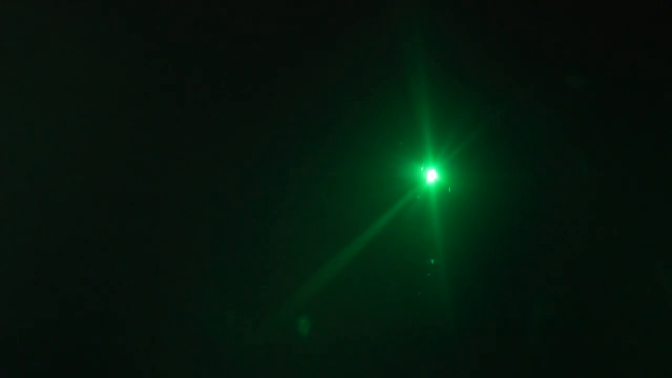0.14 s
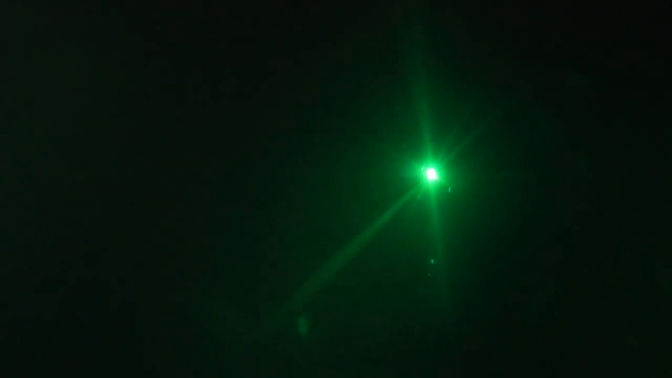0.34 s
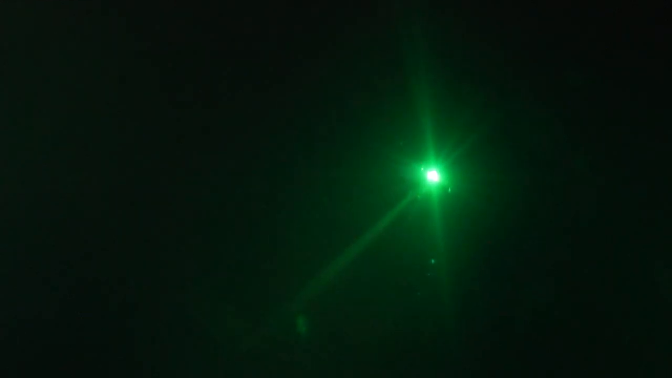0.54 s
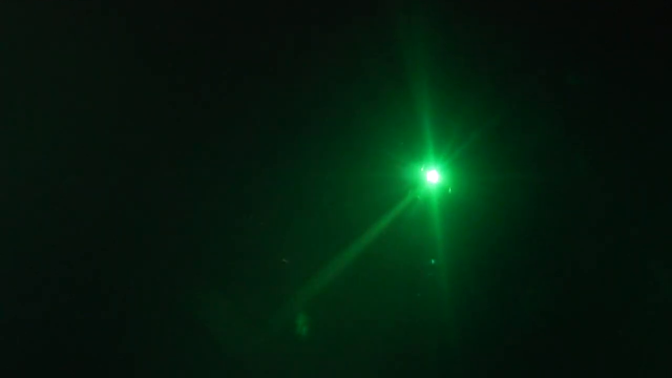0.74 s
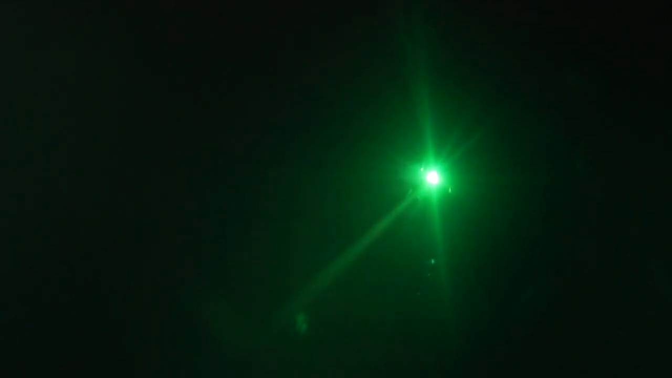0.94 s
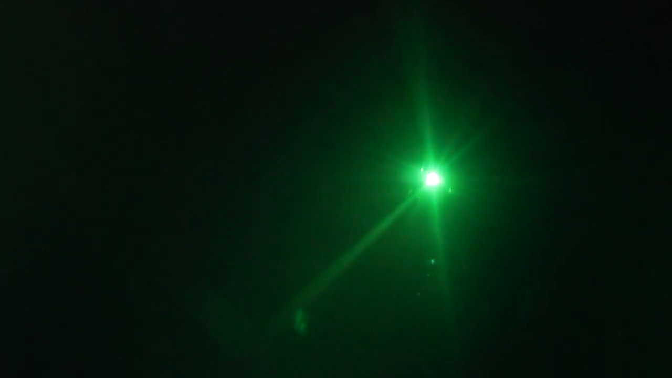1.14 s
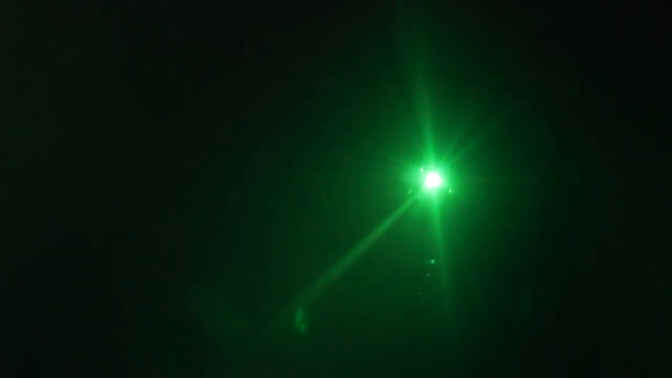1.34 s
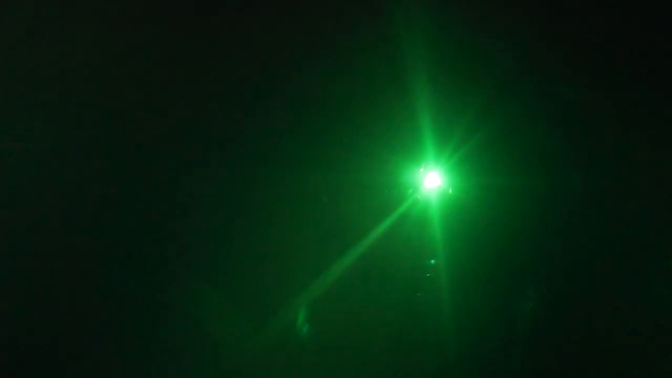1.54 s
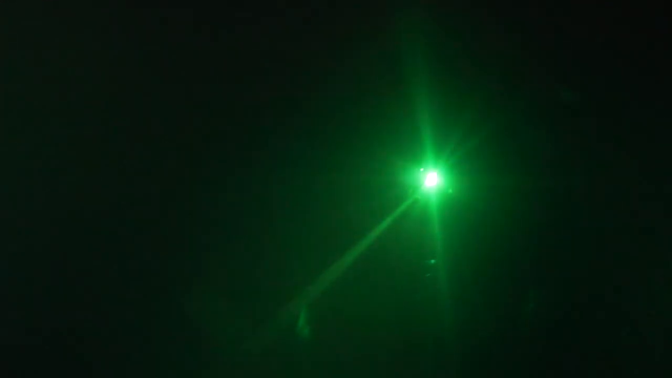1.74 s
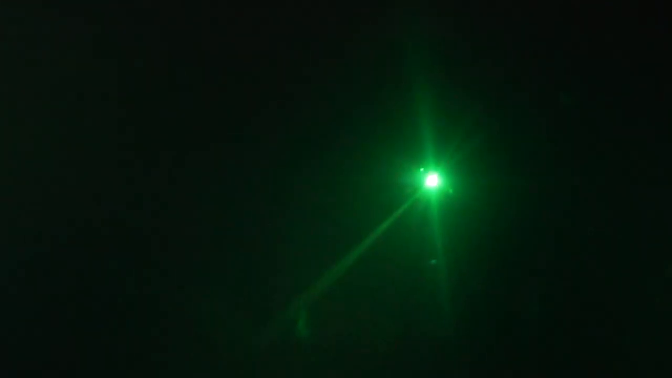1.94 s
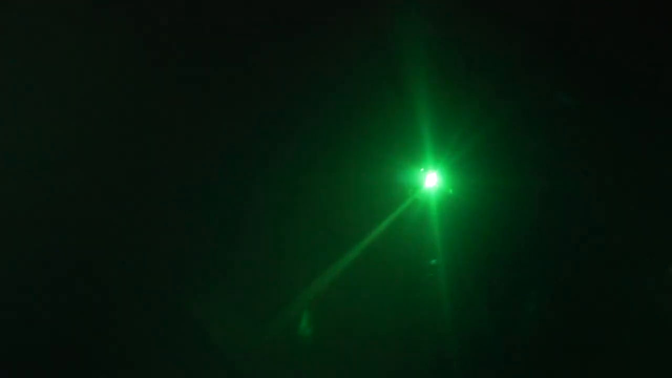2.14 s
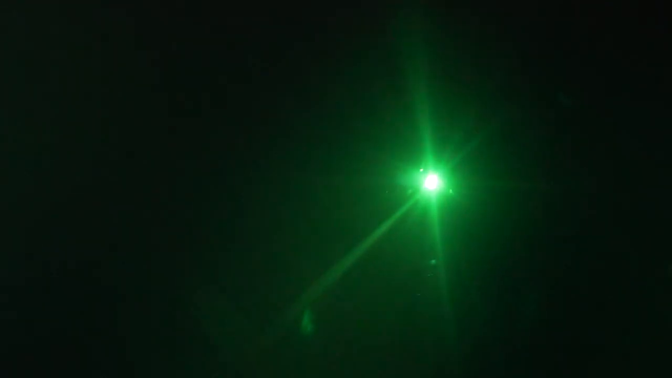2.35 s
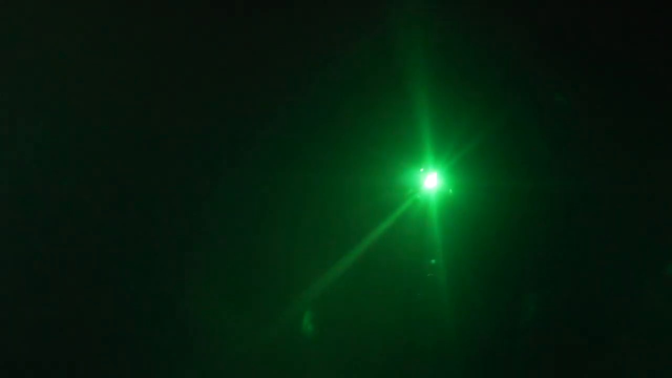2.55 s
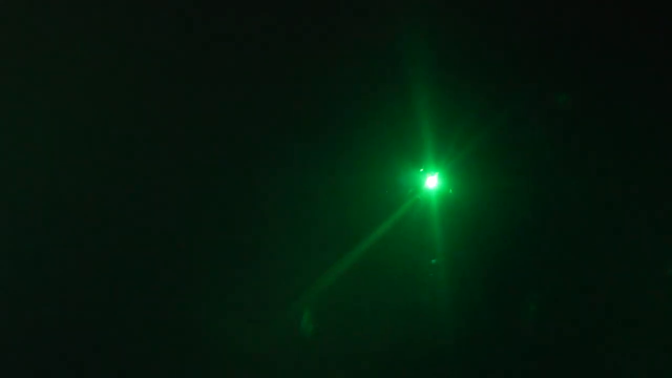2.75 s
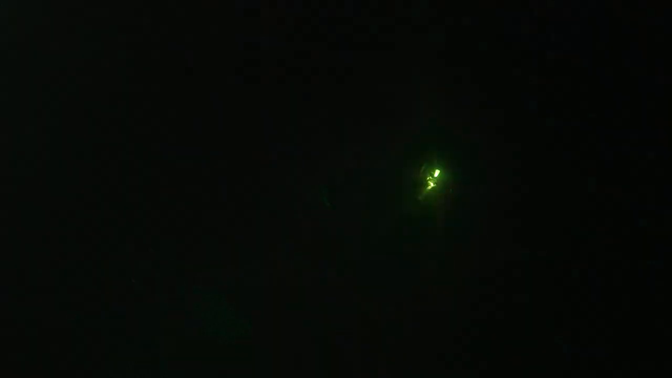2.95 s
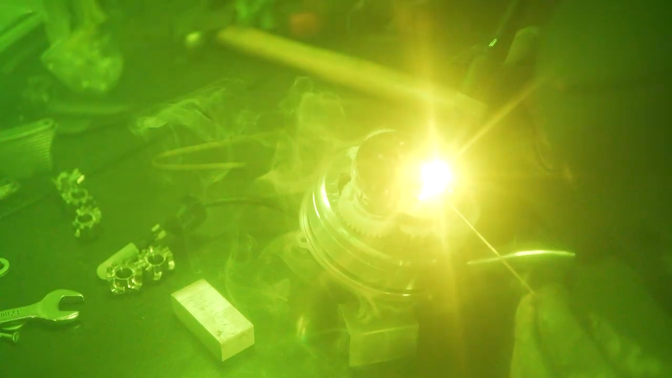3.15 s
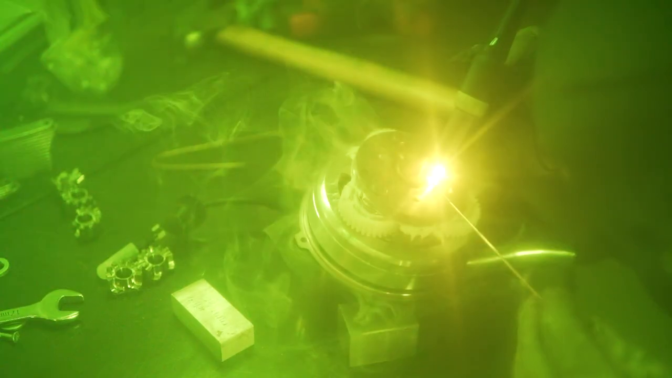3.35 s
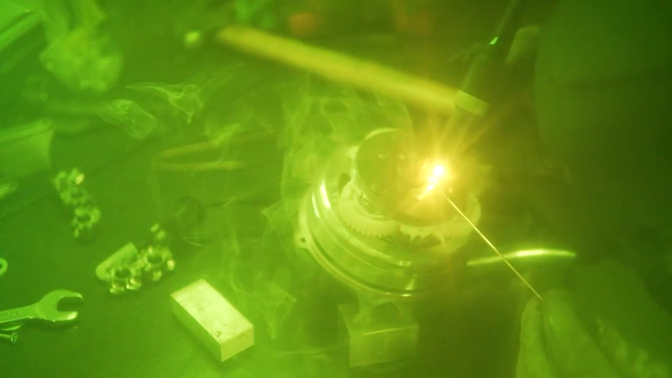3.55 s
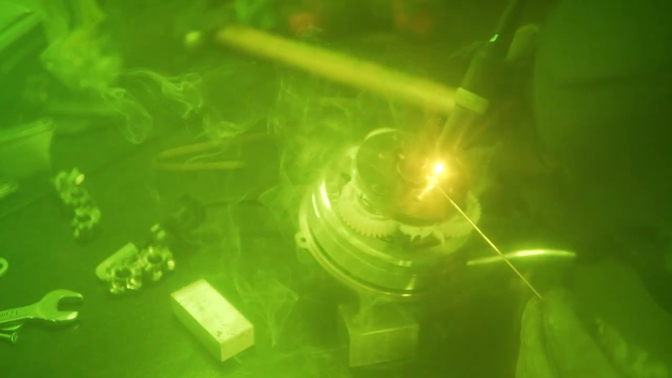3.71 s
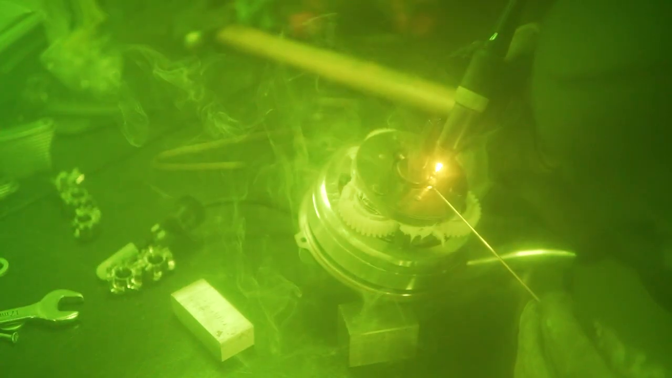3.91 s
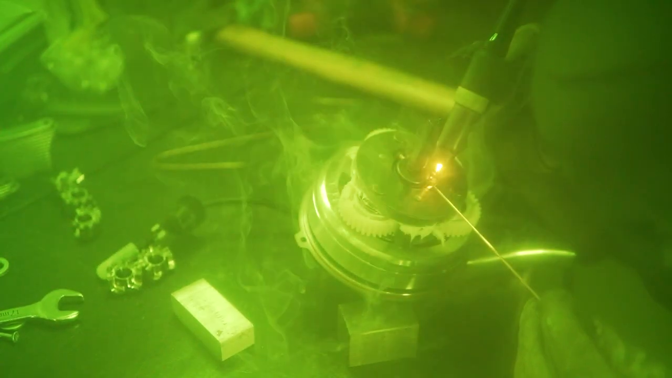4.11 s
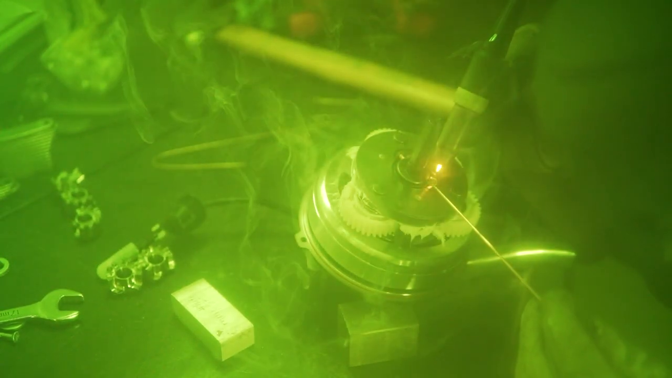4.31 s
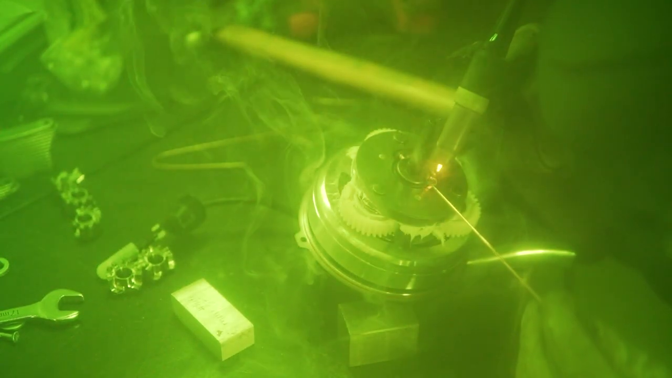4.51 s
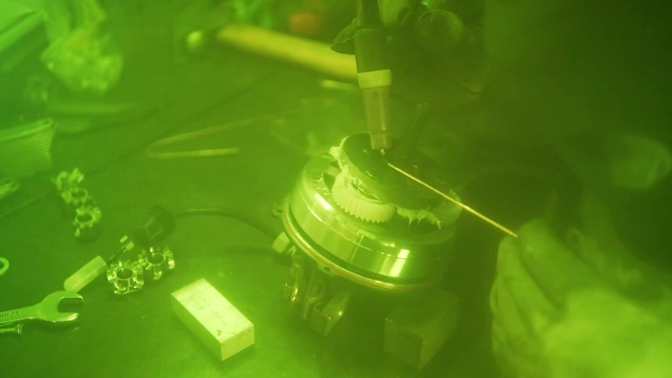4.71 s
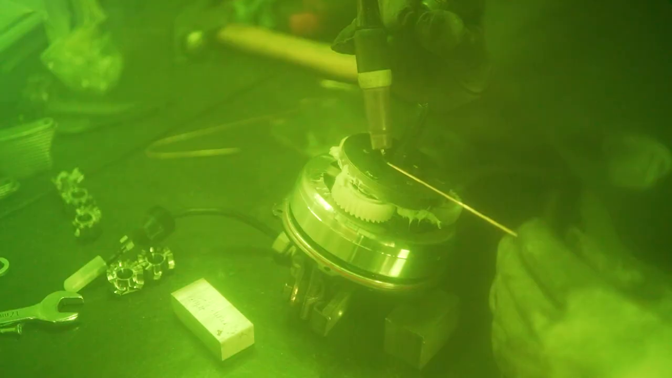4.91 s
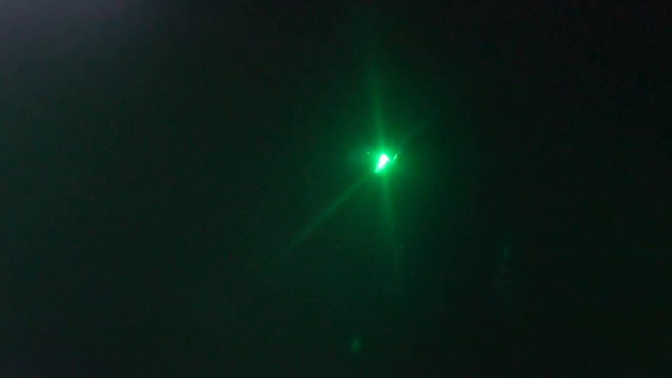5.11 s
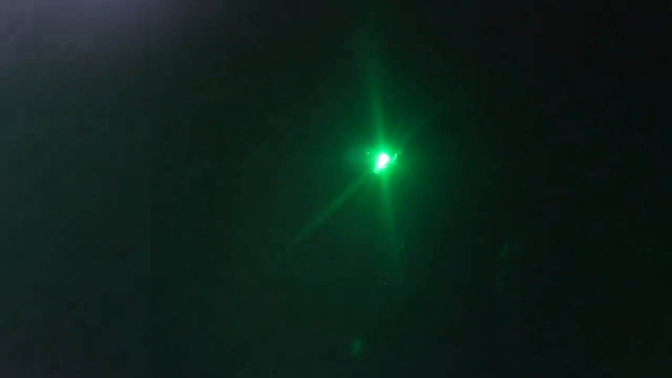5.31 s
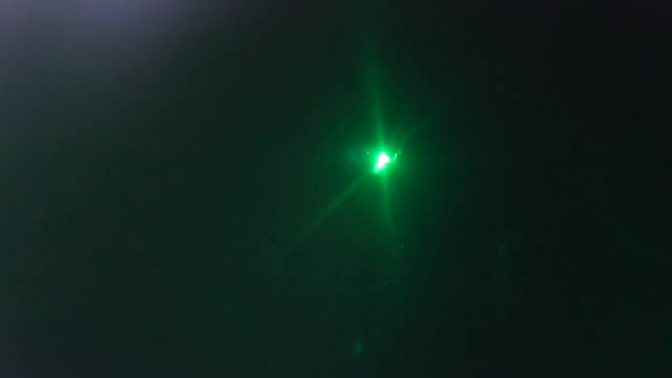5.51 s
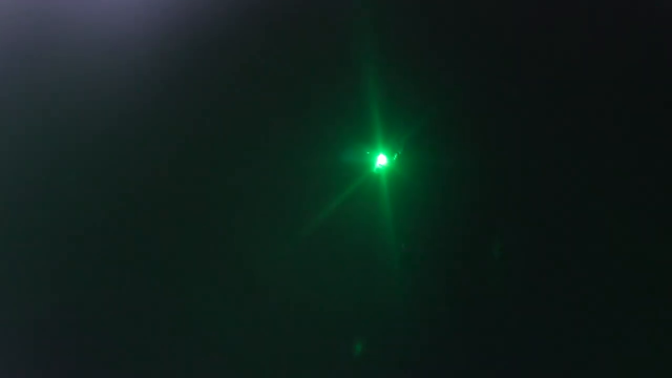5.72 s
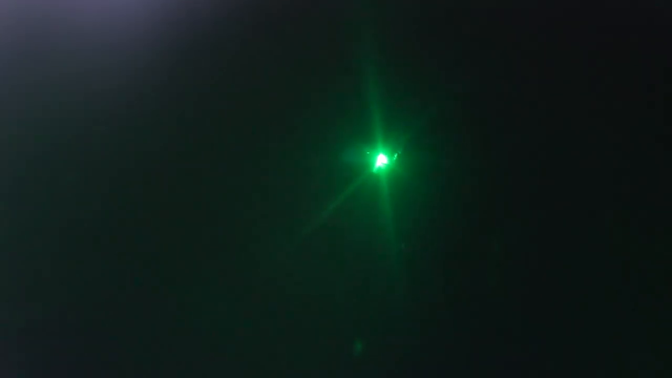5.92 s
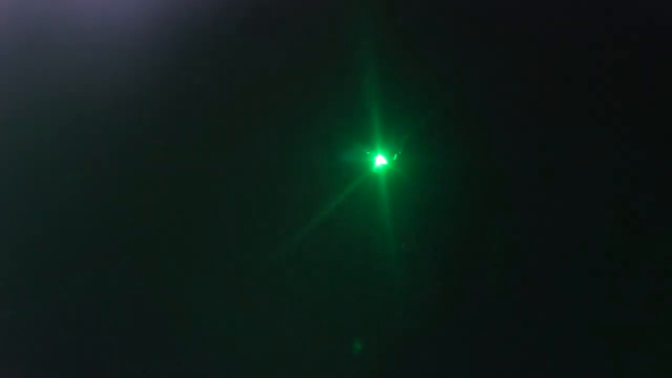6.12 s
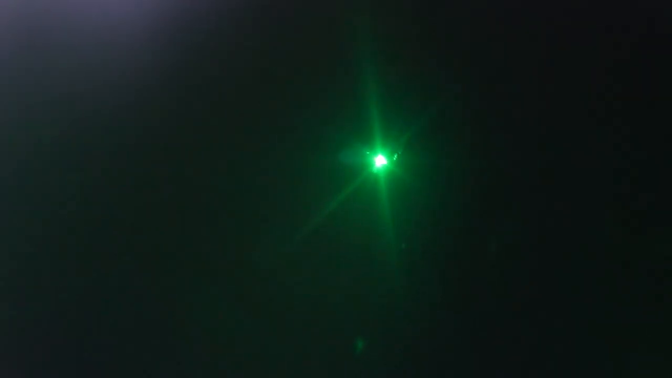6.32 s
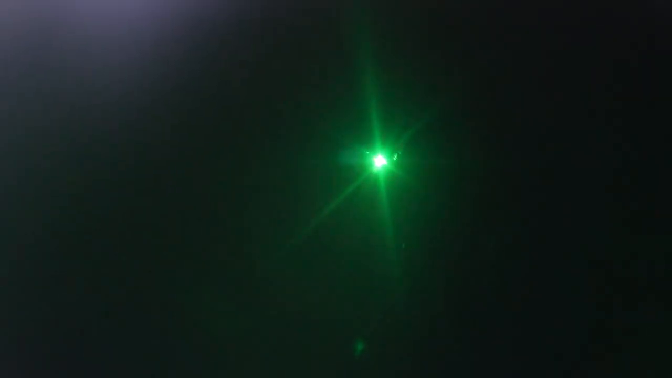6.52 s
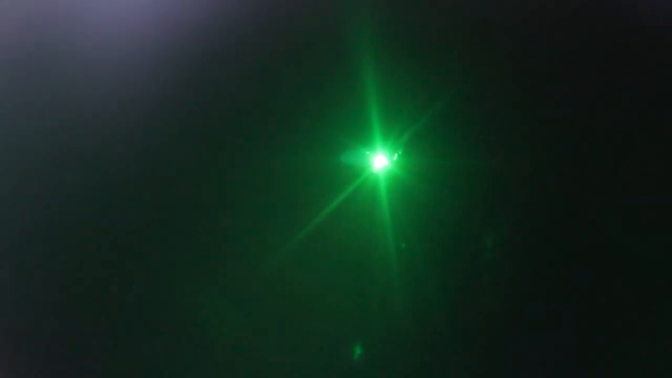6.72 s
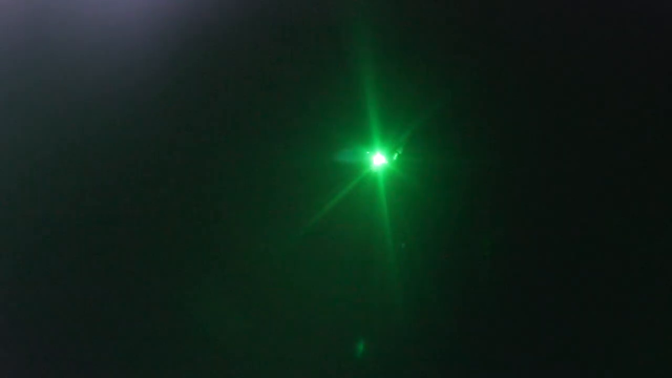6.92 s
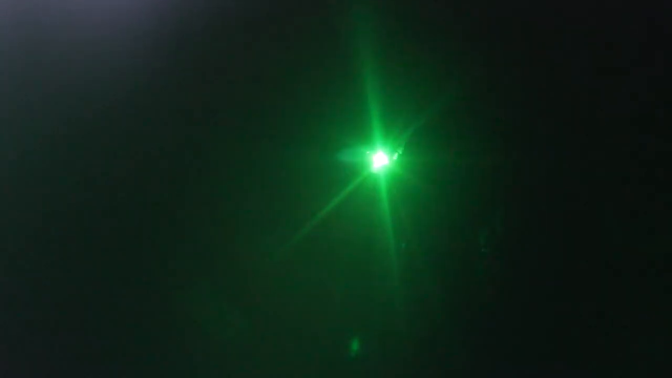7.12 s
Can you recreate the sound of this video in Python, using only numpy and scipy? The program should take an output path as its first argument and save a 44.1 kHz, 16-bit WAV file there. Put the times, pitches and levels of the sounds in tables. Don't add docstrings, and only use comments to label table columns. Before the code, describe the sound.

An electric arc welder crackles and hisses, breaks off with hard snaps and clunks, hums quietly, then strikes again with a bang and crackles on.

```python
import sys
import numpy as np
from scipy import signal
from scipy.fft import rfft, irfft
from scipy.io import wavfile
from scipy.ndimage import uniform_filter1d

SR = 44100
rng = np.random.default_rng(int(sys.argv[2]) if len(sys.argv) > 2 else 0)


def generate_wav(signal):
    frames = np.transpose(np.atleast_2d(signal))
    scaled = np.clip(frames, -1, 1) * 32767
    pcm = np.round(scaled).astype(np.int16)
    wavfile.write(sys.argv[1], SR, pcm)


def ratio_of_db(decibels):
    return 10 ** (np.asarray(decibels, float) / 20)


N = 320166
t = np.arange(N) / SR

CLOCK_S = 0.01
ARC_OUT_S, SCENE_CHANGE_S = 3.0, 4.738
# start_s, peak_db
BREAK = [
    (2.9404, -8),
    (2.9505, -3),
    (2.9604, -7.5),
    (2.9904, -13.5),
]
# start_s, bang_db, bang_t60_s, spatter_db, spatter_t60_s, spits_per_s
STRIKE = (5.1246, -3, 0.01, -20, 0.71, 8000)
# start_s, peak_db
FAINT = [(0.04, -24.1), (0.5, -24.2), (0.56, -23.9), (0.57, -23.6), (0.66, -24.5), (0.71, -22.8),
         (0.72, -22.1), (1.44, -24.3), (1.67, -22.8), (1.94, -23.2), (2.02, -21.8), (2.07, -20.1),
         (2.28, -21.3), (2.3, -21.4), (2.49, -19.0), (2.83, -22.7), (5.18, -22), (5.19, -18.1),
         (5.26, -20.7), (5.3, -22.1), (6.1, -20.2), (6.22, -23.6), (6.31, -23.7), (6.37, -22.6),
         (6.39, -20.1), (6.63, -23.3), (6.69, -21.3), (6.78, -22.5), (6.8, -20.1), (6.84, -22.0),
         (6.9, -21.0), (6.93, -23.7), (7.16, -18.8), (7.2, -23.6)]


def rms_one(x):
    return x / np.sqrt(np.mean(x ** 2) + 1e-20)


def in_time(rows):
    s, *columns = np.transpose(rows)
    return [np.interp(t, s, c) for c in columns]


def drift(rate):
    r = np.exp(-80 * np.pi * rate / SR)
    slow = signal.lfilter([1], [1, -2 * r, r * r], rng.standard_normal(N // 40 + 2002))[2000:]
    return np.interp(np.arange(N) / 40, np.arange(len(slow)), rms_one(slow))


def resonance(x, hz, width_hz):
    r = np.exp(-np.pi * width_hz / SR)
    poles = [1, -2 * r * np.cos(2 * np.pi * hz / SR), r * r]
    return signal.lfilter([(1 - r * r) / 2, 0, (r * r - 1) / 2], poles, x)


def lifted(x, hz, width_hz, db):
    return x + (ratio_of_db(db) - 1) * resonance(x, hz, width_hz)


def coloured(x, spectrum, peaks=(), lift_db=0):
    hz = np.fft.rfftfreq(len(x), 1 / SR) + 1
    at, level = np.transpose(spectrum)
    power = ratio_of_db(np.interp(np.log(hz), np.log(at), level, left=-90)) ** 2
    for centre, width, db in peaks:
        power = power + ratio_of_db(db + lift_db) ** 2 / (1 + (2 * (hz - centre) / width) ** 2) ** 2
    return rms_one(irfft(rfft(x) * np.sqrt(power), len(x)))


def clicks(rows):
    s, db = np.transpose(rows)
    out = np.zeros(N)
    out[np.round(s * SR).astype(int)] = ratio_of_db(db) * (-1) ** np.arange(len(s))
    return out


def ticks_of(rows):
    s, db = np.transpose(rows)
    return np.round(s / CLOCK_S).astype(int), db


def snaps():
    # start_s, peak_db
    loose_snaps = [
        (5.1664, -15),
        (5.2285, -19),
        (5.2385, -24),
        (5.2557, -6.5),
        (5.2615, -14),
        (5.2775, -17),
    ]
    # start_s, peak_db, thin (0 dull, 1 thin)
    droplets = [(0.0504, -20, 0), (1.0192, -14, 1), (1.1082, -15, 0), (1.1829, -14, 1), (1.1884, -20, 1),
                (1.197, -19, 0), (1.2023, -20, 0), (1.2347, -16, 0), (1.238, -17, 0), (1.243, -13, 0),
                (1.2623, -18, 0), (1.2744, -16, 0), (1.2834, -19, 0), (1.3342, -12, 0), (1.3471, -17, 0),
                (1.3539, -16, 0), (1.5745, -12, 0), (1.6252, -17, 0), (1.7018, -17, 0), (1.7936, -18, 0),
                (1.9873, -20, 0), (2.1473, -19, 0), (2.7339, -16, 0), (5.3028, -17, 0), (6.322, -15, 0),
                (6.6365, -17, 0), (6.8448, -18, 0), (7.2419, -17, 0)]
    # start_s, body_db
    body = [
        (0, -9),
        (2.96, -20),
        (5.2, 11.5),
        (5.8, 0.5),
        (7.26, -10),
    ]
    # delay_ms, share
    paths_1 = [(0.0, 1.0), (0.2, -0.4), (0.54, 0.35), (0.66, 0.16), (0.93, 0.83), (1.18, 0.44),
               (1.34, -0.3), (1.79, -0.3), (3.7, -0.23), (3.92, 0.15), (4.06, 0.19), (4.9, -0.29),
               (5.31, -0.18), (6.98, -0.19)]
    paths_2 = [(0.0, -0.2), (0.11, 1.0), (0.16, 0.59), (0.27, -0.24), (0.48, 0.69), (0.68, 0.3),
               (0.79, -0.76), (0.95, -0.32), (0.98, 0.7), (1.32, -0.41), (3.2, -0.16), (3.49, -0.19),
               (4.15, 0.24), (4.54, 0.17)]
    # ring_hz, width_hz, soft_top_hz, steep_top_hz
    snap_1 = (7000, 1750, 4900, 15300)
    snap_2 = (6940, 2830, 6650, 11300)
    snap_break = (4130, 3020, 4700, 8200)

    first = snap_heard(paths_1, *snap_1, thump_db=-0.5, tail_db=-26.5, tail_t60=0.079)
    second = snap_heard(paths_2, *snap_2, thump_db=2.0, tail_db=-26.5, tail_t60=0.07)
    dull = snap_heard(paths_1[:5], *snap_break, thump_db=12.0, tail_db=-25.5, tail_t60=0.14)
    thin = snap_heard(paths_1[:3], 11000, 5000, 15000, 17000, thump_db=-9, tail_db=-17.5, tail_t60=0.05)

    steps = current_steps() + clicks(loose_snaps)
    steps = steps + on_clock(*ticks_of(FAINT), 1) + ratio_of_db(-8.0) * clicks(BREAK)
    clocked = ratio_of_db(2.0) * signal.fftconvolve(steps * (t < SCENE_CHANGE_S), first)[:N]
    clocked += ratio_of_db(-0.13) * signal.fftconvolve(steps * (t > SCENE_CHANGE_S), second)[:N]
    clocked += ratio_of_db(in_time(body)[0]) * resonance(clocked, 2110, 1340)

    torn = signal.fftconvolve(np.abs(steps), np.exp(-t[:800] / 0.0012))[:N] * rng.standard_normal(N)
    clocked += ratio_of_db(-19) * resonance(torn, 6000, 7000)

    dull_rows = BREAK + [(s, db - 0.5) for s, db, is_thin in droplets if not is_thin]
    thin_rows = [(s, db - 7.5) for s, db, is_thin in droplets if is_thin]
    dull_spits = signal.fftconvolve(clicks(dull_rows), dull)[:N]
    thin_spits = signal.fftconvolve(clicks(thin_rows), thin)[:N]
    return clocked + dull_spits + thin_spits


def current_steps():
    # start_s, peak_db
    nudges = [(.31, -11), (.43, -13), (.48, -15.5), (.54, -15.5), (.71, -21), (.79, -13), (1.18, -10),
              (1.32, -12), (1.46, -11), (1.51, -11.5), (1.56, -11), (1.66, -19), (1.78, -12), (1.84, -11),
              (1.96, -15), (2.03, -13), (2.07, -17), (2.23, -11), (2.42, -11), (2.49, -17), (2.59, -12),
              (2.63, -16), (2.70, -15.5), (2.78, -10), (2.82, -22),
              (5.27, -21), (5.31, -14), (5.34, -12), (5.43, -10.5), (5.46, -11), (5.58, -11.5),
                (5.61, -14.5), (5.90, -9.5), (5.93, -15.5), (6.03, -11.5), (6.17, -11), (6.20, -9.5),
                (6.24, -12), (6.28, -12), (6.44, -10.5), (6.53, -15), (6.61, -11.5), (6.86, -9.5),
                (6.91, -12.5), (7.00, -14.5), (7.09, -15.5), (7.15, -15)]
    # start_s, peak_db
    held = [(.34, -13), (1.00, -17), (1.11, -12), (1.25, -9), (1.48, -17), (1.69, -15.5), (2.19, -13.5),
            (2.28, -17.5), (5.54, -9.5), (5.66, -14), (6.09, -10.5), (6.13, -16.5), (6.95, -8.5)]
    # start_s, steps, peak_db
    hunts = [(.06, 1, -20), (.09, 3, -18.5), (.14, 3, -19), (.21, 6.1, -16.5), (.66, 1, -24), (.87, 1, -22),
             (.89, 4, -15), (1.06, 4, -17.5), (1.64, 1, -19), (1.87, 4.1, -13), (2.12, 1, -15),
             (2.14, 3, -14.5), (2.74, 3, -13), (2.81, 1, -11), (5.20, 1, -18), (5.22, 3, -13.5),
             (5.74, 6.6, -10.5), (5.82, 1, -10.5), (5.98, 2.8, -14), (6.34, 3, -15), (6.41, 1, -12.5),
             (6.49, 4, -11.5), (6.56, 3.97, -13.5), (6.64, 3.7, -16.5), (6.69, 1, -21), (6.71, 3.97, -12),
             (6.82, 1, -11), (6.89, 1, -9), (7.18, 1, -15), (7.22, 4, -12)]
    # start_s, change_db
    uneven = [(0.16, 3.5), (0.22, 2.4), (0.23, -3.1), (0.24, 3.9), (0.44, -2.2), (0.79, -2.4),
              (0.89, 2.3), (1.08, 2.0), (1.19, -4.0), (1.25, -2.3), (1.33, -2.5), (1.48, -2.1),
              (1.52, 2.0), (1.54, -4.8), (1.69, -5.5), (1.71, 2.7), (1.9, -3.0), (1.97, -2.6),
              (2.04, -8.1), (2.12, -2.1), (2.23, -4.2), (2.31, -8.4), (2.64, 2.1), (2.7, -3.4),
              (2.75, -2.0), (2.82, -4.1), (2.91, -3.0), (2.92, -2.3), (2.94, 1.9),
              (5.2, 2.5), (5.24, -2.3), (5.25, -3.6), (5.34, -2.6), (5.43, -2.1), (5.46, -2.5),
                (5.47, -2.7), (5.58, -4.7), (5.68, -3.3), (5.77, -2.4), (5.8, -3.2), (5.94, -3.6),
                (5.99, -2.7), (6.0, 4.1), (6.03, -2.5), (6.11, -3.3), (6.28, 2.5), (6.35, -2.4),
                (6.58, 2.7), (6.64, 1.9), (6.65, 2.5), (6.71, -3.0), (6.74, 2.5), (6.86, -2.1),
                (6.89, -3.1), (6.92, 2.9), (7.18, -2.9), (7.25, -3.9)]

    rows = []
    for table, hold in ((nudges, 1), (held, 2)):
        for s, db in table:
            tick = round(s / CLOCK_S)
            rows += [(tick, db, 1), (tick + hold, db - 1, -1)]
    for s, steps, db in hunts:
        rows += [(round(s / CLOCK_S) + k, db, (-1) ** k) for k in range(round(steps))]
    rows += [(round(2.85 / CLOCK_S) + k, -6.5 - 0.36 * k, 1) for k in range(10)]
    ticks, db, way = np.transpose(rows)
    ticks = ticks.astype(int)

    idle = np.r_[0:297, 520:726]
    spread_db = 0.8 * rng.standard_normal(idle[-1] + 1)
    off_rule_db = np.zeros(idle[-1] + 1)
    landed, by_db = ticks_of(uneven)
    off_rule_db[landed] = by_db
    way = way * ~np.isin(ticks, ticks_of(FAINT)[0])
    stepped = on_clock(ticks, db + spread_db[ticks] + off_rule_db[ticks], way)
    return stepped + on_clock(idle, -32.0, rng.standard_normal(len(idle)))


def on_clock(ticks, db, way):
    # first_run_s, second_run_s
    clock_lag_s = (.0004, .0041)
    # one_slot_s, two_slots_s
    odd_lag_s = (.0002, .0004)
    ticks = np.asarray(ticks)
    late = np.where(ticks * CLOCK_S < SCENE_CHANGE_S, *clock_lag_s)
    late = late + ticks % 2 * rng.choice(odd_lag_s, ticks.shape)
    out = np.zeros(N)
    out[((ticks * CLOCK_S + late) * SR).round().astype(int)] = -way * ratio_of_db(db)
    return out


def snap_heard(paths, ring_hz, width_hz, soft_hz, steep_hz, thump_db, tail_db, tail_t60):
    after = t[:SR // 4]
    arrivals = np.zeros(len(after))
    for ms, share in paths:
        arrivals[round(ms * SR / 1000)] += share
    swell = np.clip(after / 0.0012, 0, 1)
    arrivals += ratio_of_db(tail_db - 60 * after / tail_t60) * swell * rng.standard_normal(len(after))
    r = np.exp(-np.pi * width_hz / SR)
    ring = signal.lfilter([1, -1], [1, -2 * r * np.cos(2 * np.pi * ring_hz / SR), r * r], arrivals)
    ring = signal.sosfilt(signal.butter(2, soft_hz, fs=SR, output="sos"), ring)
    thump = resonance(arrivals, 383, 150) + ratio_of_db(-3.5) * resonance(arrivals, 760, 750)
    steep = signal.butter(2, steep_hz, fs=SR, output="sos")
    heard = signal.sosfilt(steep, ring + ratio_of_db(thump_db) * thump)
    return heard / np.abs(heard).max()


def strike():
    # pitch_hz, level_db (per Hz)
    bang_colour = [(59, -32), (100, 0), (307, -4), (1590, -19.5), (2010, -11), (4490, -5.5), (5320, -2.5),
                   (10900, -3), (15600, -18.5)]
    spatter_colour = [(180, -35), (300, 2), (509, -5), (709, -4), (1540, -13), (2040, -7.5), (4670, -5.5),
                      (5330, -2), (15600, -28)]
    s, bang_db, bang_t60, spatter_db, spatter_t60, per_s = STRIKE
    after = np.maximum(t - s, 0)
    glow = ratio_of_db(spatter_db - 60 * after / 0.36)
    burst = ratio_of_db(bang_db - 60 * np.maximum(after - 0.002, 0) / bang_t60)
    bang = (burst + glow) * coloured(rng.standard_normal(N), bang_colour)
    spits = (rng.random(N) < per_s / SR) * ratio_of_db(2.5 * rng.exponential(1, N)) * rng.choice([-1, 1], N)
    fade = ratio_of_db(spatter_db - 60 * after / spatter_t60 + 1.9 * drift(130))
    return (t > s) * (bang + fade * coloured(spits, spatter_colour))


def knocks():
    # start_s, level_db, ring_hz, t60_s, contact_ms
    contacts = [(2.9565, -9, 643, 0.066, 3), (2.979, -14.5, 677, 0.11, 5), (2.990, -12.5, 295, 0.035, 2),
                (2.966, -25, 2280, .03, 5), (3.024, -23, 650, 0.04, 3.5), (3.06, -31.5, 670, 0.1, 5),
                (3.11, -34.5, 660, 0.14, 7), (3.178, -32, 8660, .03, .4), (3.662, -21.5, 350, 0.059, 5.5),
                (3.803, -30, 4320, 0.035, 3), (4.739, -26.5, 650, 0.084, 4),
                (4.9785, -30, 4600, 0.062, -0.5), (4.9835, -33, 4720, .05, .3), (4.98, -45, 9800, .08, -1),
                (2.952, -25, 4900, 0.054, 2), (5.126, -23, 226, 0.3, 9)]
    out = np.zeros(N + SR)
    after = t[:SR // 2]
    for s, db, hz, t60, ms in contacts:
        fade = ratio_of_db(-60 * after / t60) * np.clip(after * 1000 / max(ms, 0.1), 0, 1)
        ring = np.sin(2 * np.pi * hz * after)
        ring = ring + 0.3 * np.sin(2 * np.pi * 1.09 * hz * after + 6 * rng.random())
        tick = ratio_of_db(11.5 - 6 * ms) * rng.standard_normal(len(after))
        if 4500 < hz < 5000:
            tick_hz, width_hz = hz, 1500
        else:
            tick_hz, width_hz = np.clip(hz - 2200, 4800, 9000), 5500
        tick = resonance(resonance(tick, tick_hz, width_hz), tick_hz, width_hz)
        out[round(s * SR):][:len(after)] += ratio_of_db(db + 2.0) * fade * (ring + tick)
    return out[:N]


def hiss(arc_on):
    # start_s, level_db
    levels = [
        [(0.0, -33), (2.65, -30.5), (2.95, -30.5), (3.0, -36)],
        [(3.0, -36.5), (3.186, -37.5), (4.738, -37.5)],
        [(4.738, -36.5), (4.98, -34.5), (5.124, -36)],
        [(5.12, -31), (6.14, -30.5), (7.26, -30)],
    ]
    # pitch_hz, level_db (per Hz)
    colours = [
        [(820, -48), (1400, -11.5), (2540, -15), (3240, -9), (3960, -10), (4290, -1.5), (4700, -6.5),
         (5250, -11.5), (7480, -1.5), (9240, -15), (15600, -30)],
        [(820, -35), (1400, -22), (1900, -8), (2460, -19.5), (3200, -2), (3760, -8), (4340, -3.5), (5640, -20),
         (6360, -3.5), (9620, -12.5), (15600, -55.5)],
        [(820, -53), (1400, -23), (2950, -10.5), (3370, -13), (3730, -7), (5310, -14), (6360, -16), (7860, -1),
         (15600, -56)],
        [(820, -53), (1400, -18.5), (2700, -5), (2920, -8.5), (3760, -1), (4470, -9), (5520, 2), (6300, -9),
         (7630, 1.5), (8790, -6.5), (15600, -33)],
    ]
    # pitch_hz, width_hz, level_db
    humps = [
        [(3310, 490, -10), (4230, 35, 0), (5360, 100, -6), (6390, 120, -6), (7080, 58, -8), (7400, 100, -2),
         (7690, 34, -3), (8600, 160, -11)],
        [(3290, 250, -2), (4220, 73, 0), (6240, 220, -3), (6930, 200, -6), (7400, 100, -5), (8180, 110, -7),
         (8600, 130, -9), (9570, 73, -11)],
        [(3130, 250, -8), (4110, 91, -7), (4580, 94, -5), (5220, 340, -4), (7940, 170, 1)],
        [(3800, 37, -2), (4220, 130, -5), (5450, 180, -1), (6980, 72, -3), (7350, 40, 0), (7830, 140, 0),
         (8190, 45, -3), (9260, 140, -12)],
    ]
    # lift of the resonances, lift_db; level trim, trim_db
    lifts_db = [4.3, 2, 2.9, 2.5]
    trims_db = [-2.5, -1.5, -0.5, -4]
    # pitch_hz, width_hz
    notches = [(4750, 500), (5720, 400), (4500, 450), (4500, 300)]
    out = np.zeros(N)
    flutter = ratio_of_db((1.0 + 0.91 * arc_on) * drift(24.5))
    for rows, colour, peaks, lift, trim, (hz, width_hz) in zip(levels, colours, humps, lifts_db, trims_db, notches):
        during = (t >= rows[0][0]) & (t < rows[-1][0])
        air = in_helmet(coloured(rng.standard_normal(N), colour, peaks, lift))
        out += during * ratio_of_db(in_time(rows)[0] + trim) * (air - 0.85 * resonance(air, hz, width_hz))
    return out * flutter


def in_helmet(x):
    after = t[:SR // 8]
    echoes = ratio_of_db(-34 - 60 * after / 0.12) * rng.standard_normal(len(after))
    return rms_one(x + signal.fftconvolve(x, echoes)[:N])


def whistles():
    # start_s, end_s, pitch_hz, width_hz
    cup_tones = [(.2, 2.4, 4229, 14), (.8, 2.96, 7698, 40), (.8, 2.9, 11800, 500), (0, 2.9, 12700, 150),
                 (0, 1.6, 5380, 300), (3, 4.738, 5350, 300), (3, 4.738, 4330, 300), (5.3, 7.26, 3792, 20),
                 (5.3, 7.26, 4220, 120), (5.55, 6.75, 7345, 18), (5.3, 7.26, 7826, 40), (0, .2, 4245, 40),
                 (2.4, 2.96, 4217, 22), (4.738, 5.12, 5400, 500), (4.4, 6.4, 1166, 50),
                 (.5, 2.96, 7402, 40)]
    tone_db = [-40, -46.5, -57, -63, -44.5, -55, -50, -43, -44.5, -45, -48, -44, -37.5, -49, -52.5, -46]
    out = np.zeros(N)
    for (start, end, hz, width_hz), db in zip(cup_tones, tone_db):
        tone = rms_one(resonance(resonance(rng.standard_normal(N), hz, width_hz), hz, width_hz))
        swell = np.sqrt(uniform_filter1d(tone ** 2, size=200) + 0.15)
        out += (t > start) * (t < end) * ratio_of_db(db) * rms_one(tone / swell ** 0.85)
    return out


def supply():
    # start_s, roar_db, hum_db
    load = [
        [(0.0, -35, -46), (0.43, -36, -43), (2.95, -34, -43)],
        [(3.02, -39.5, -50.5), (4.29, -41, -50), (5.11, -41.5, -48)],
        [(5.2, -34.5, -40), (5.46, -35, -42.5), (7.26, -35.5, -42.5)],
    ]
    # pitch_hz, level_db (per Hz)
    fan_colour = [(76, -34), (130, -7.5), (187, -13), (233, -3), (287, -1), (358, -4.5), (492, -4.5),
                  (1030, -12), (1170, -10.5), (1480, -22), (1800, -20.5), (2340, -30), (3960, -120)]
    # pitch_hz, width_hz, level_db
    fan_peaks = [(350, 120, -1.5), (675, 57, -3.5), (1168, 150, -11.5)]
    # pitch_hz, level_db
    hum_lines = [(107, -8), (120, -9.5), (240, 2), (360, -1), (600, -5), (1157, -11.5)]
    roar_db, hum_db = in_time(np.concatenate(load))
    roar = coloured(rng.standard_normal(N), fan_colour, fan_peaks)
    roar = ratio_of_db(roar_db - 2.5 + 1.0 * drift(10.0)) * roar
    hum = np.zeros(N)
    for hz, db in hum_lines:
        hum += ratio_of_db(db + 2.1 * drift(1.45)) * np.sin(2 * np.pi * (hz * t + rng.random()))
    return roar + ratio_of_db(uniform_filter1d(hum_db, size=8000) - 0.56) * hum


def whine():
    # start_s, pitch_hz, level_db
    inverter = [
        [(.87, 14620, -62), (1.2, 14270, -64), (1.53, 14260, -63), (1.62, 14420, -60), (1.88, 14180, -64),
         (1.96, 14370, -58), (2.08, 14270, -65), (2.23, 14370, -61), (2.36, 14280, -69), (2.5, 14170, -61),
         (2.71, 14160, -61)],
        [(5.3, 14140, -60), (5.46, 14140, -59), (5.53, 14300, -61), (5.62, 14220, -63), (5.7, 14330, -67),
         (6.6, 14150, -70), (6.68, 14310, -65), (6.9, 14180, -73), (7.02, 14230, -61), (7.13, 14180, -67),
         (7.26, 14340, -58)],
    ]
    out = np.zeros(N)
    for rows in inverter:
        hz, level_db = in_time(rows)
        hz = hz + 15 * drift(10)
        during = (t > rows[0][0]) * (t < rows[-1][0])
        tone = np.sin(2 * np.pi * np.cumsum(hz) / SR)
        out += during * ratio_of_db(level_db + 2 * drift(6) + 0.6) * tone
    return out


def shop():
    # pitch_hz, level_db (per Hz)
    air_colour = [(500, 0.5), (1200, -2.5), (2400, -9), (6000, -8), (10000, -18.5), (16000, -20.5)]
    rumble_colour = [(21, -45), (35, -26), (48, -7), (70, -11.5), (85, -5.5), (102, 2.5), (122, -1.5),
                     (140, -22), (165, -3), (200, -7), (260, -41), (440, -120)]
    air = ratio_of_db(-47.5) * coloured(rng.standard_normal(N), air_colour)
    return air + ratio_of_db(-47.0) * coloured(rng.standard_normal(N), rumble_colour)


def bench(x):
    # start_s, lower_band_db, upper_band_db
    creep = [(0, 0, 2.5), (1.4, 1.5, 2), (2.2, -4, 1.7), (2.95, -8, -1.5), (3.1, 1.5, -0.8),
             (5.1, -0.5, -1), (5.6, 0.5, -0.5), (6.4, 1.8, 3), (7.26, -0.5, 3.5)]
    # pitch_hz, width_hz, absent_s, full_s, level_db
    shifting_nulls = [(7880, 350, 1.4, 0.5, -6), (4600, 180, 1.8, .8, -8), (3970, 100, 1.2, 2.7, -8),
                      (6820, 120, 0, 2, -5), (8200, 100, .6, 1.6, -4), (6850, 120, 5.8, 7.8, -9),
                      (7150, 150, 6, 7.1, -7)]
    # pitch_hz, width_hz, level_db
    ripple_1 = [(1490, 57, -11), (2200, 120, 2), (2540, 260, -6.5), (2745, 140, 5), (2890, 100, -7),
                (3680, 500, 2.5), (3800, 130, -5.5), (9500, 200, -2), (9870, 168, 4.5), (10200, 219, 4.5),
                (10430, 550, -6.5)]
    ripple_2 = [(1290, 130, 5), (2650, 120, 2.5), (3875, 361, -5), (4030, 250, 3.5), (4620, 97, -7),
                (5530, 97, -6), (6750, 328, -4.7), (7330, 111, -6), (7600, 480, 3), (8350, 190, 4.5),
                (8530, 223, -5.3), (9800, 94, -6.0), (10292, 421, -4)]
    ripple_3 = [(686, 160, 3), (1730, 58, -3), (2043, 91, 5), (2420, 200, -4), (2640, 170, 4.5),
                (4350, 69, 3), (5740, 380, -2.5), (5870, 220, 3), (8510, 160, 5.5), (10870, 410, 2.5),
                (11300, 270, -12), (11330, 270, 2.5)]
    # pitch_hz, width_hz, level_db
    nulls = [
        [(8750, 70, -9), (7270, 60, -7)],
        [(5700, 200, -4)],
        [(8850, 250, -6), (4310, 90, -6)],
    ]
    lower_db, upper_db = in_time(creep)
    x = lifted(lifted(x, 5600, 730, lower_db), 8200, 1150, upper_db)
    for hz, width_hz, absent, full, db in shifting_nulls:
        same_run = (t < ARC_OUT_S) if full < ARC_OUT_S else (t > SCENE_CHANGE_S)
        x = lifted(x, hz, width_hz, same_run * db * np.clip((t - absent) / (full - absent), 0, 1))
    places = [(ripple_1 + nulls[0], t < ARC_OUT_S),
              (ripple_2 + nulls[1], (t >= ARC_OUT_S) & (t < SCENE_CHANGE_S)),
              (ripple_3 + nulls[2], t >= SCENE_CHANGE_S)]
    out = np.zeros(N)
    for ripple, during in places:
        heard = x
        for hz, width_hz, db in ripple:
            heard = lifted(heard, hz, width_hz, db)
        out += during * heard
    return out


def scene():
    arc_on = (t < BREAK[-1][0]) | (t > STRIKE[0])
    arc = snaps() + strike() + hiss(arc_on) + whistles()
    behind = supply() + whine() + shop()
    return (knocks() + bench(arc + behind))[None]


def low_pass(x):
    return signal.sosfilt(signal.butter(12, 15770, fs=SR, output="sos"), x)


def record(dry):
    top = signal.ellip(14, 0.3, 70, 15780, fs=SR, output="sos")
    mix = signal.sosfilt(top, np.clip(dry, -1, 1))
    return low_pass(mix)


dry = scene()
out = record(dry)
generate_wav(out)
```